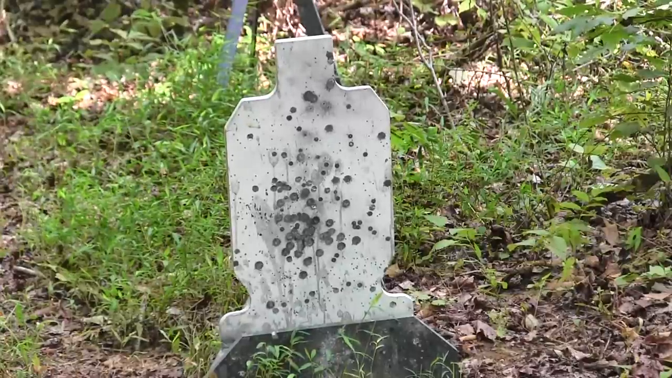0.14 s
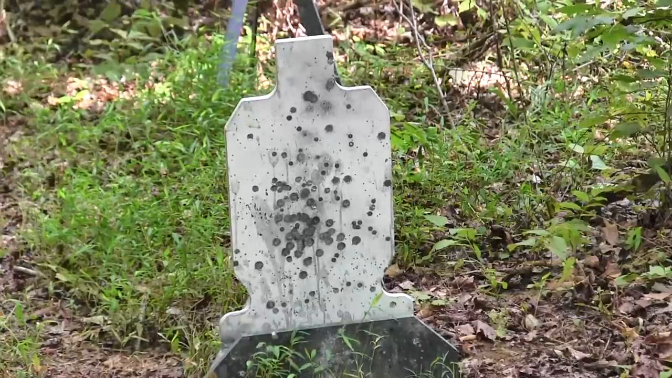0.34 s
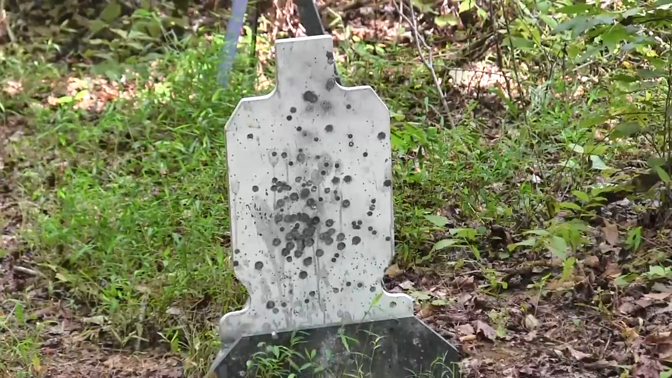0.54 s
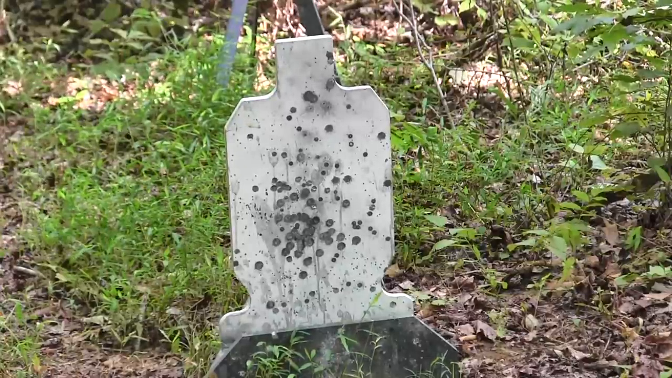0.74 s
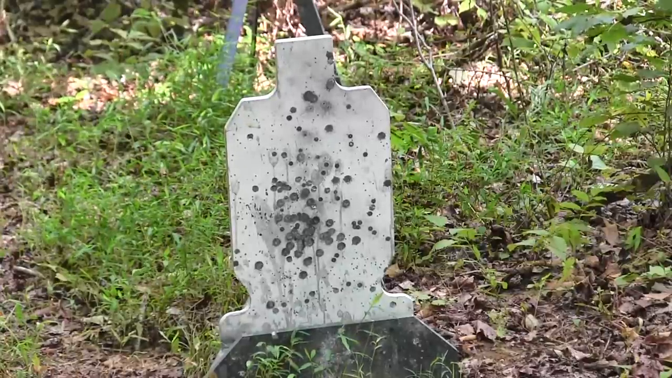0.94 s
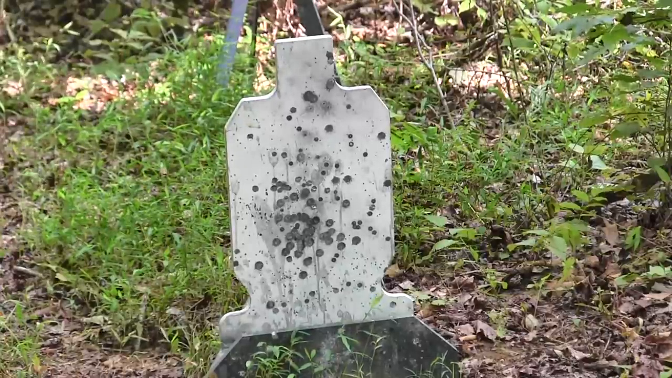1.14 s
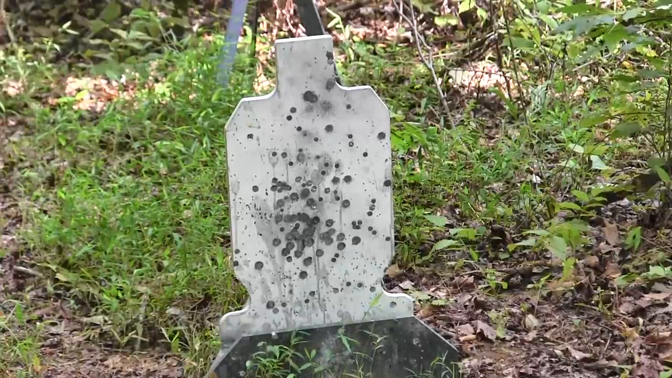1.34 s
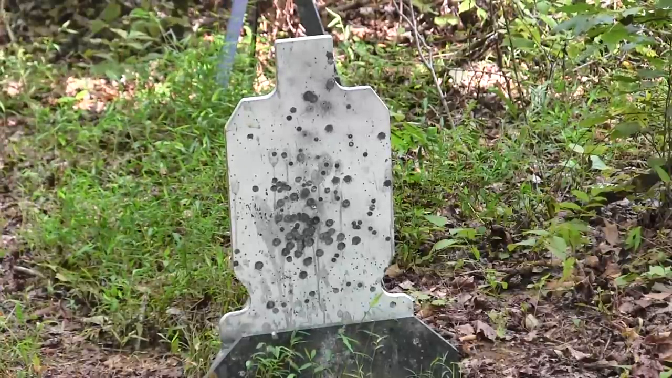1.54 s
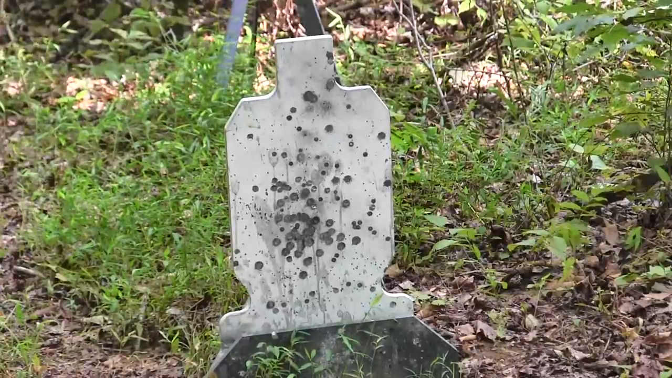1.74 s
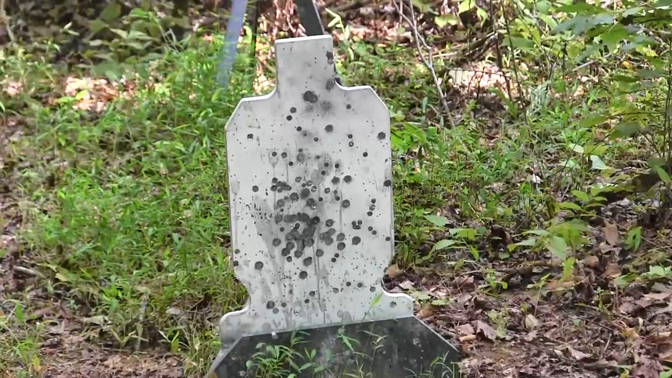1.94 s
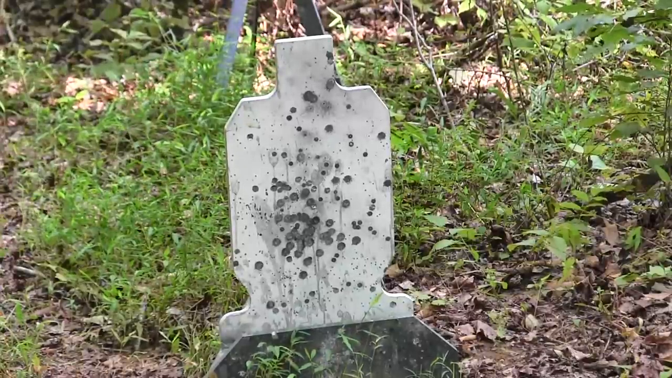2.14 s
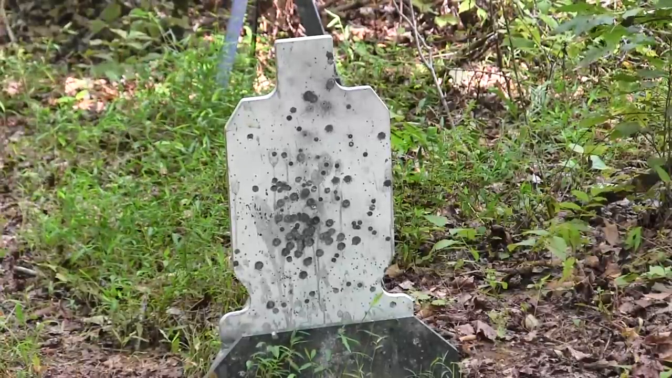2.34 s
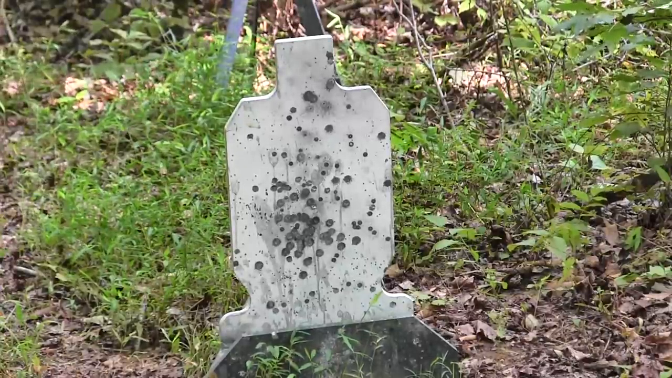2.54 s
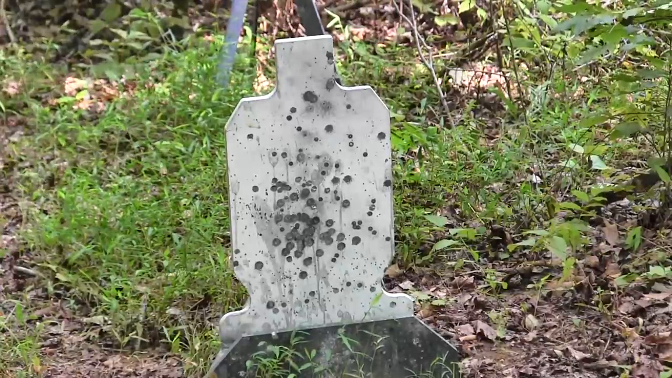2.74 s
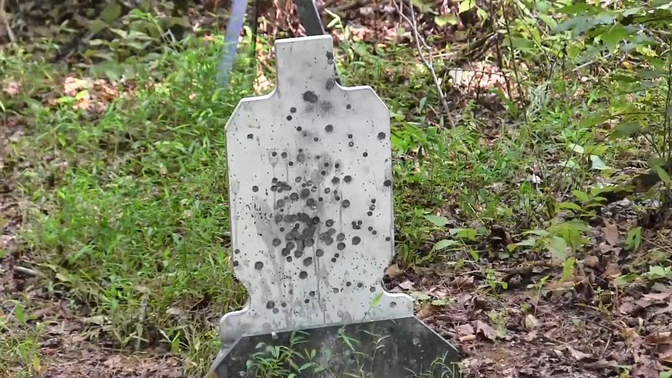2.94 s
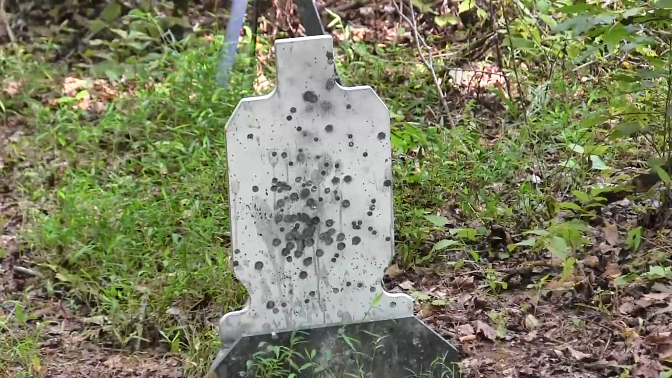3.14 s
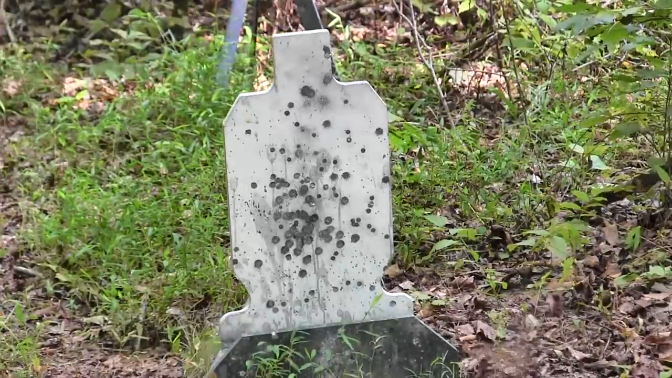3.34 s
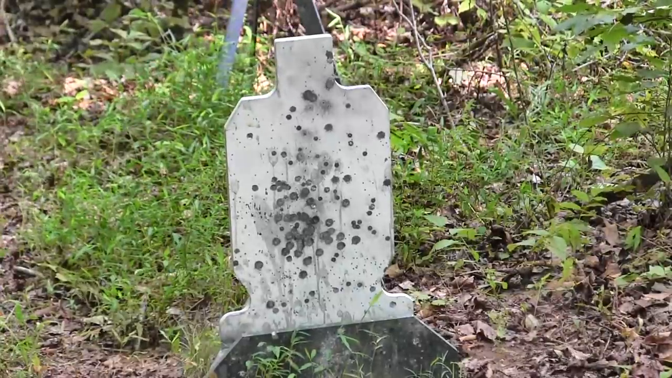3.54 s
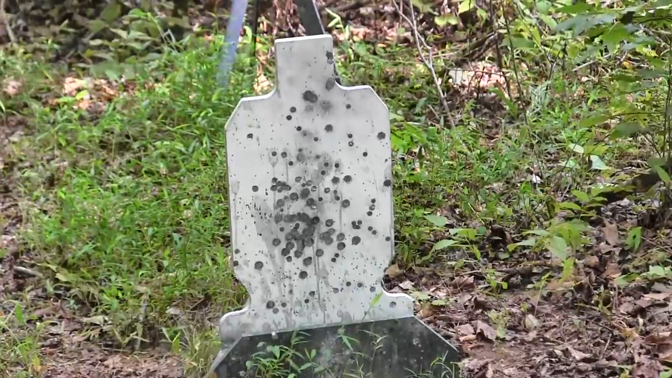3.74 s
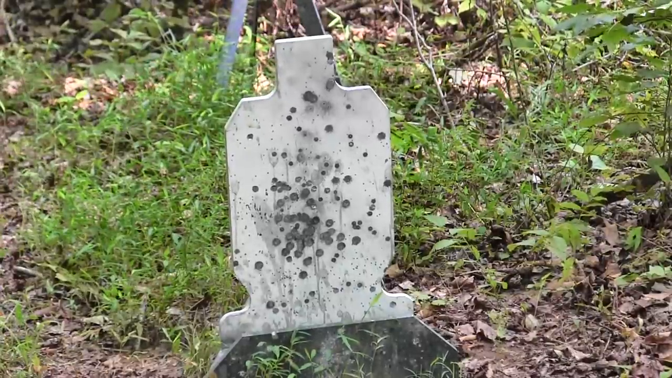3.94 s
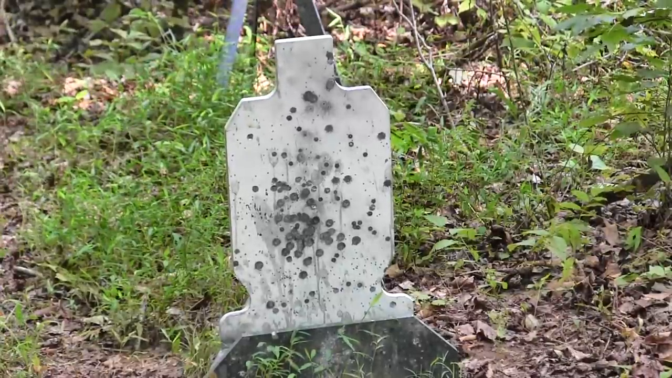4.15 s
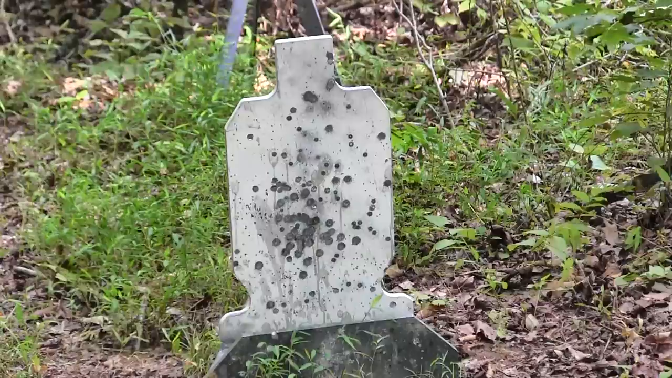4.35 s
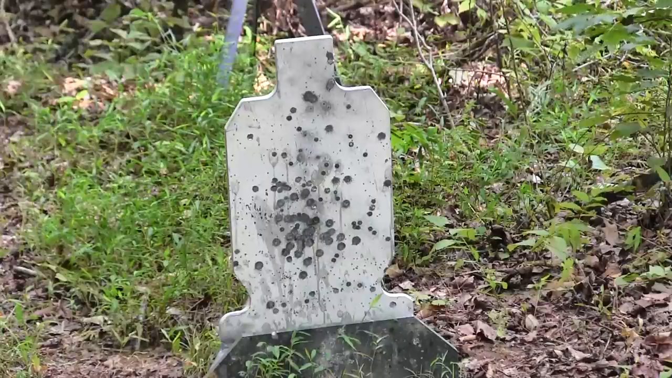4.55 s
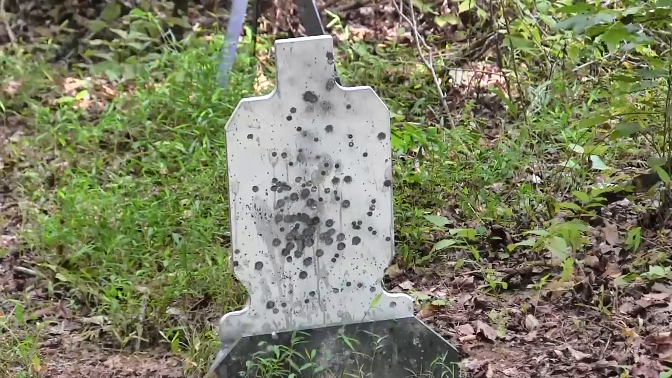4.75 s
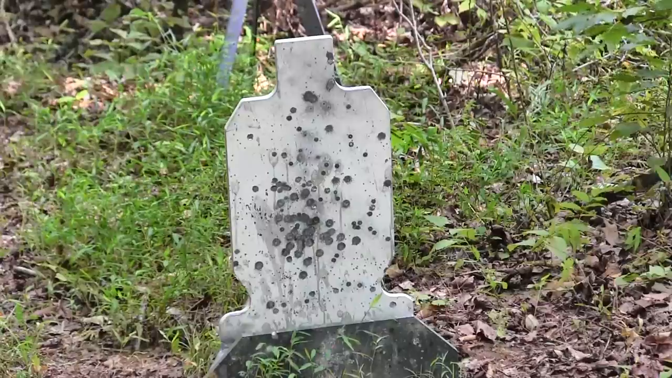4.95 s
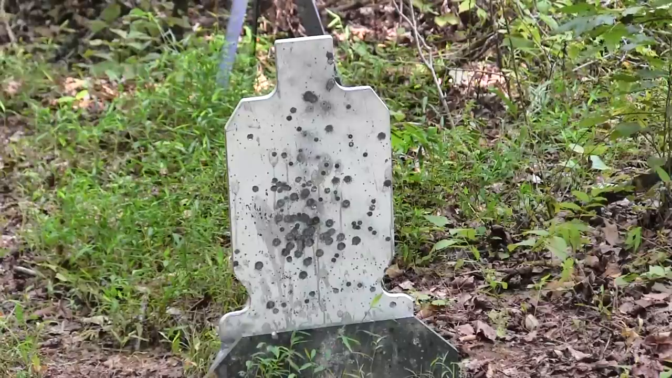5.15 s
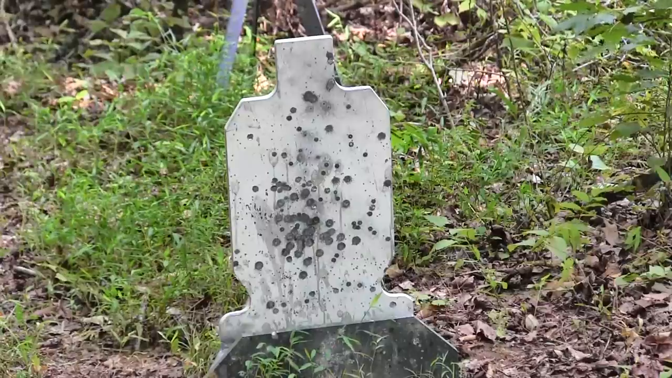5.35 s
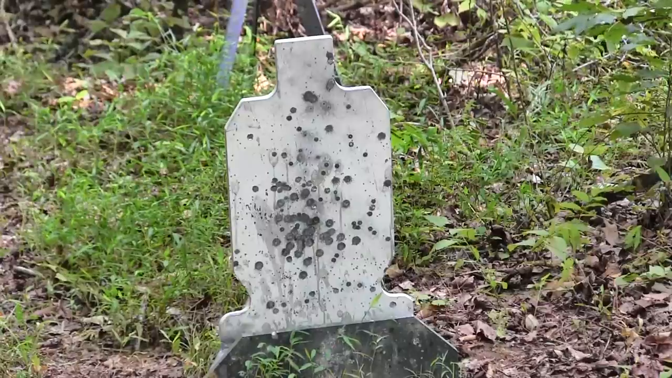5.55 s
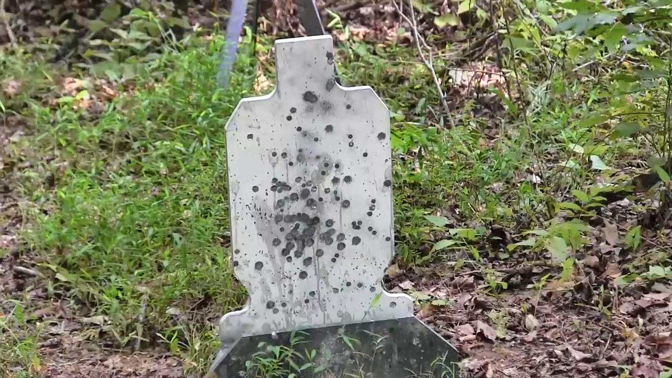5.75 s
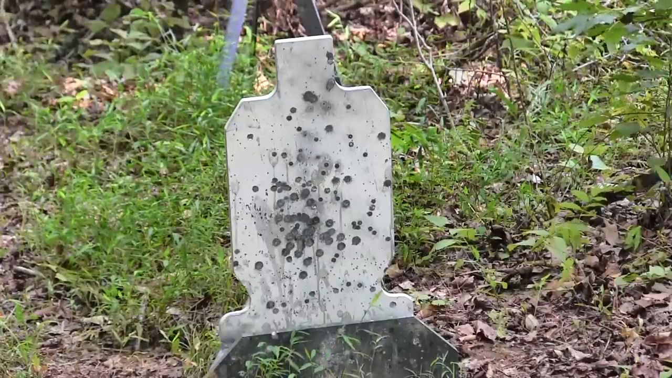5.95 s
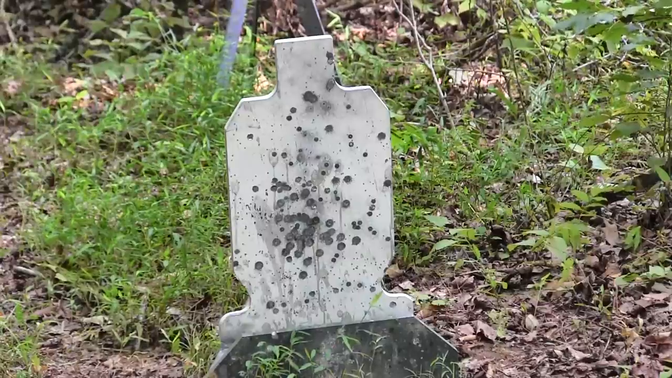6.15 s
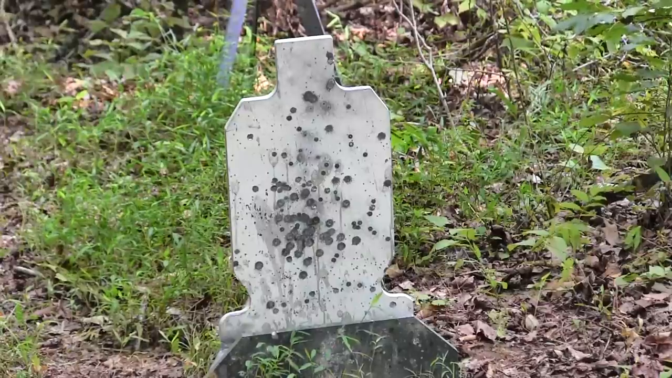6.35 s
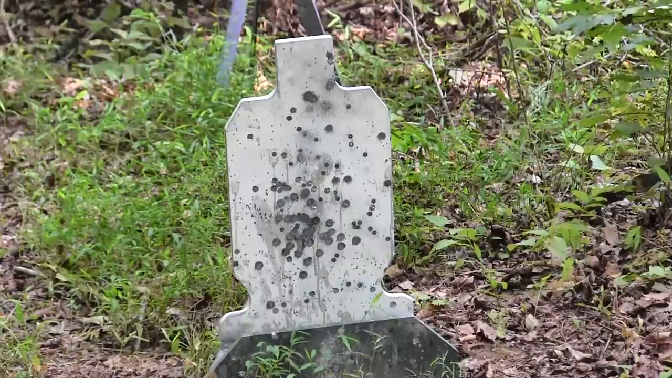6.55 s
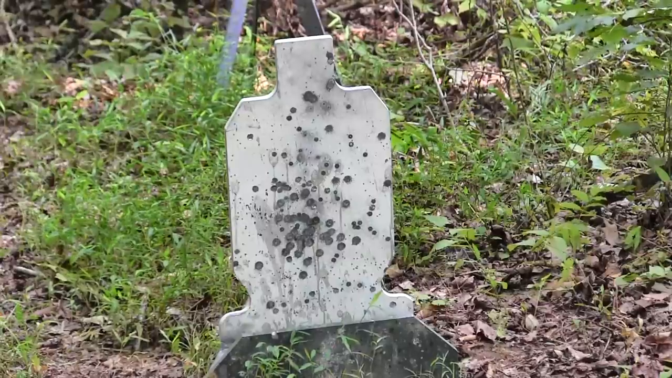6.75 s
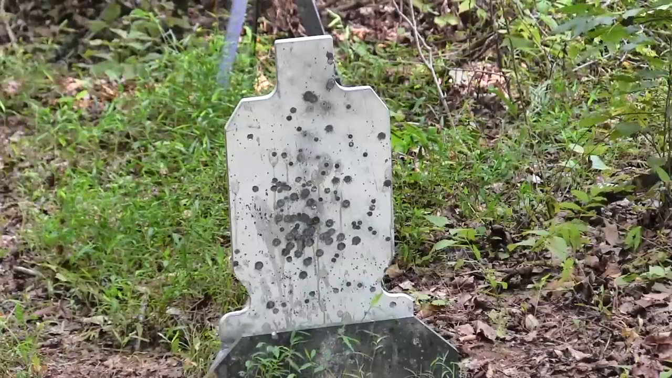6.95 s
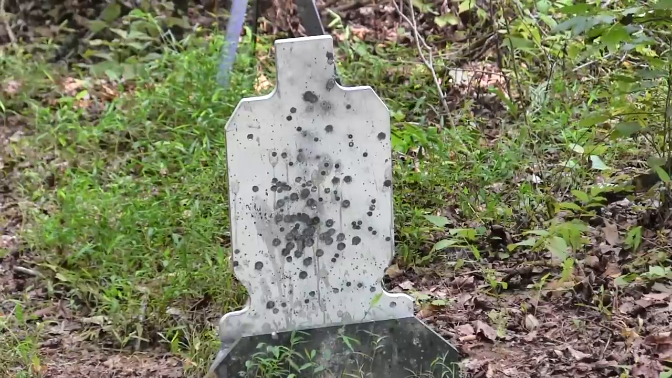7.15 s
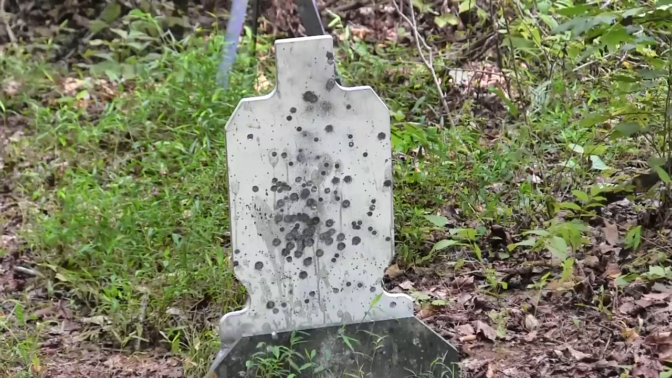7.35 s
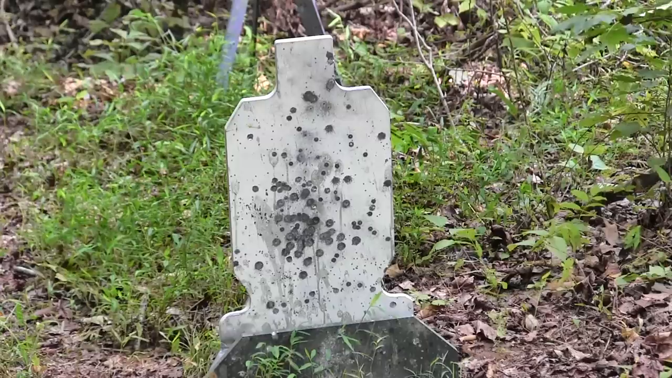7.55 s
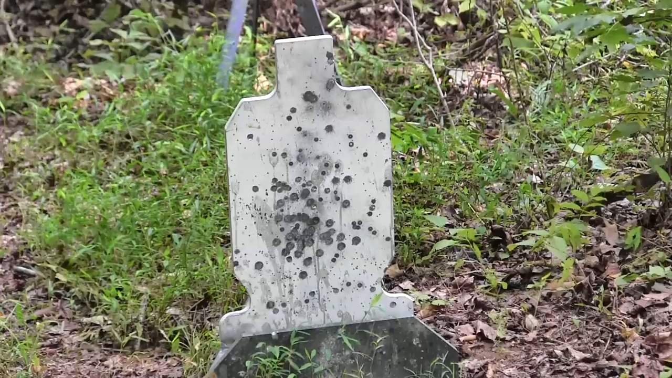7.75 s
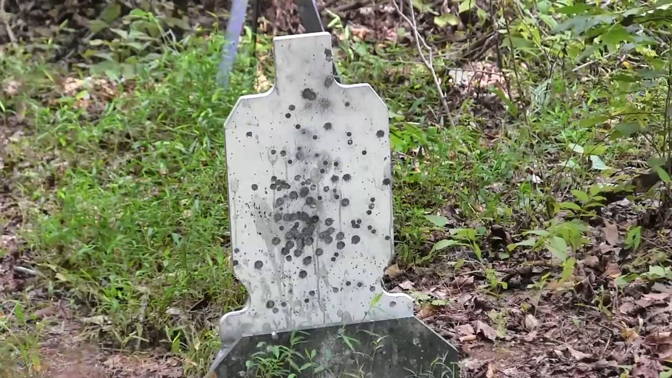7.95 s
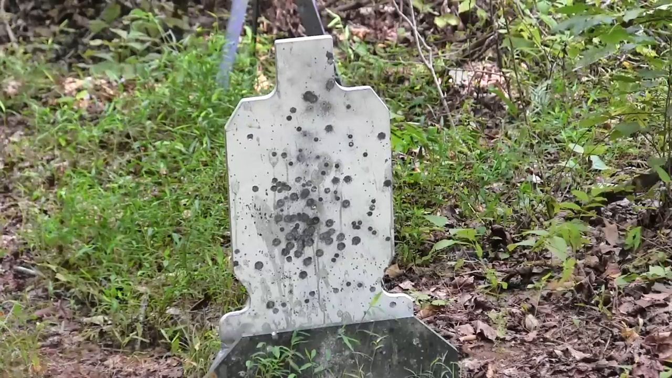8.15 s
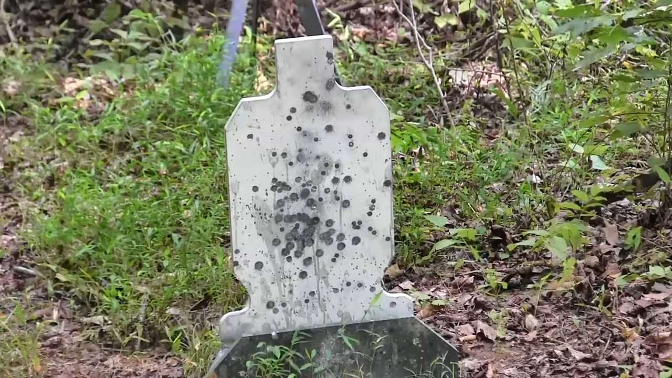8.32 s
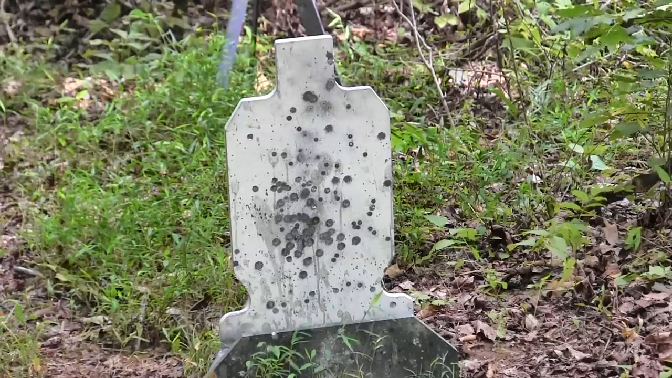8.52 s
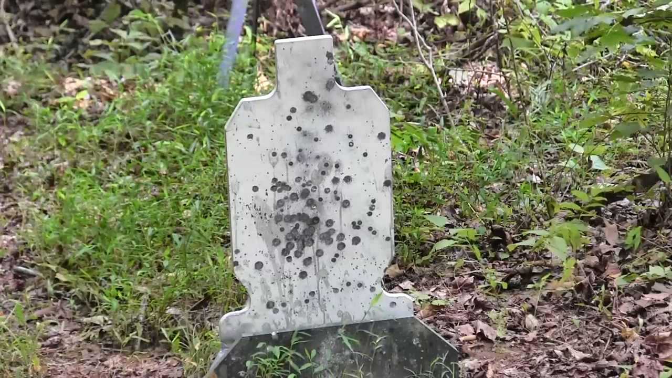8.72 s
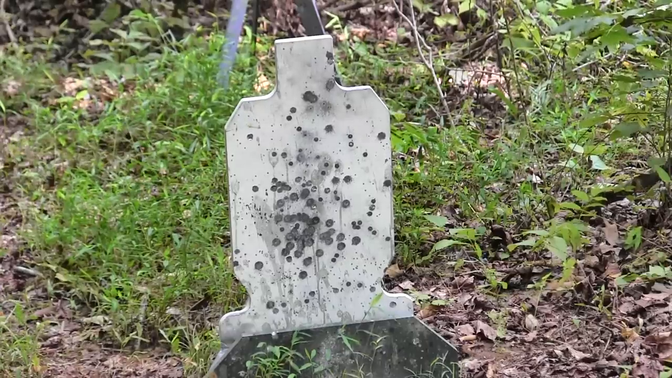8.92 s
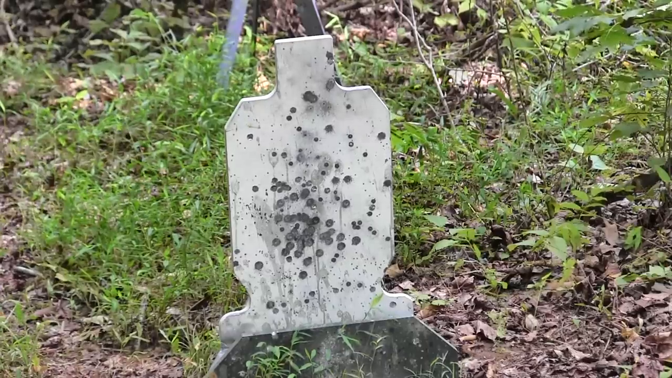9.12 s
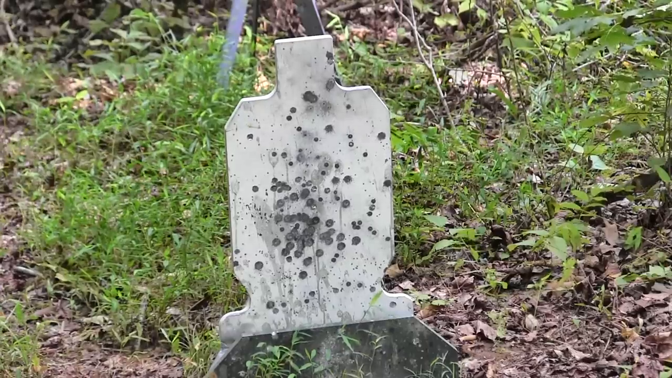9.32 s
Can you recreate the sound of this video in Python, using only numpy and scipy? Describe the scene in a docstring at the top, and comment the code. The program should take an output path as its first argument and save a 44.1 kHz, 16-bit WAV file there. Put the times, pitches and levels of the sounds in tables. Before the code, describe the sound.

Amid shrill insects and forest hush, two sharp bullet cracks each end in a bright metallic clang, forest echo and distant rifle thump.

```python
"""In the woods, with crickets and katydids around the microphone, two bullets hit a steel plate. Each sheds a
supersonic crack, shaped noise thrown off the trunks until it strikes; the plate clangs as a bank of decaying
modes. A quarter of a second later the forest throws back crack and ring, and the thump of the far rifle
follows. The litter rustles at the start, and fragments and twigs patter into it as short bursts of noise; the
insects are trains of falling tones over a hush and a breeze of coloured noise."""
import sys
import numpy as np
from scipy import signal
from scipy.fft import rfft, irfft, next_fast_len
from scipy.io import wavfile
from scipy.ndimage import uniform_filter1d, map_coordinates

SR = 44100
rng = np.random.default_rng(int(sys.argv[2]) if len(sys.argv) > 2 else 0)


def output_pcm(signal):
    """Save a mono or channel-first signal as 16-bit PCM at the path in sys.argv[1].

    Samples are clipped to [-1, 1] before scaling.
    """
    pcm = np.clip(np.atleast_2d(signal).T, -1, 1) * 32767
    wavfile.write(sys.argv[1], SR, np.round(pcm).astype(np.int16))


N = 418068
TIME = np.arange(N) / SR

# The spectra of the woods. Each row: frequency in Hz, relative density in dB per Hz.
# the hush among the trees, the low breeze and the far insect chorus
HUSH_SPECTRUM = [(20, -23), (50, -29), (90, -4.5), (130, 2.5), (240, -8), (800, -8), (2000, -12.5),
                 (4300, -15.5), (6500, -13), (7700, -19), (8800, -25), (12000, -27.5), (15800, -38)]
BREEZE_SPECTRUM = [(18, 6), (45, 6), (85, 2), (160, -3), (400, -14), (1500, -66)]
CHORUS_SPECTRUM = [(3500, -45), (4800, -2.5), (5400, 7.5), (5750, 9), (6100, -2.5), (6600, -3), (7200, -42),
                   (7800, -32), (8300, -82), (10000, -64)]
# fragments in the leaf litter
LITTER_SPECTRUM = [(100, -28), (600, -4.5), (1400, -2), (2300, 1.5), (4000, -2), (7000, -4), (11000, -16),
                   (15500, -26)]
# the bullet's shock wave, the low push of its front, and its smack into the steel
CRACK_SPECTRUM = [(30, -35), (90, -3), (180, 3.5), (300, -26), (450, -16), (900, -16), (1500, -7.5),
                  (2500, 3.5), (5500, -0.5), (8000, 0), (11000, -8.5), (15500, -20)]
PUSH_SPECTRUM = [(30, -55), (60, -28), (100, -3), (180, -0.5), (260, -4), (400, -25), (900, -21)]
SMACK_SPECTRUM = [(60, -34), (300, -11.5), (600, -15.5), (1500, -4), (3000, -7), (5500, 3), (7500, -27),
                  (11000, -24), (15500, -27)]
# what comes back from the forest, from the near leaves and from the big trunks, and the far rifle
FOREST_SPECTRUM = [(40, -47), (130, -28), (350, -22), (550, -5.5), (800, -4), (1200, 1), (2600, 2.5),
                   (4000, 5.5), (6000, 1), (8000, -7.5), (11000, -27), (15500, -63)]
LEAVES_SPECTRUM = [(1500, -38), (4000, -7), (7000, 4.5), (10000, 2.5), (15500, -28)]
TRUNKS_SPECTRUM = [(50, -32), (110, -10), (200, -3.5), (450, -3), (900, -18)]
RIFLE_SPECTRUM = [(25, -36), (50, -7), (85, 13.5), (140, 9), (280, 2.5), (500, 6), (900, -30),
                  (3000, -18.5)]

# Bouts of the quick cricket. Each row: start in seconds, end in seconds, level in dB.
QUICK_BOUTS = [(-.3, 4.1, -55), (7.1, 8.6, -54), (9.1, 9.8, -50)]
# Trills, bursts of falling chirps. Each row: start in seconds, end in seconds, level in dB.
TRILL_BURSTS = [(.8, 1.56, -52), (3.1, 3.6, -49), (6.62, 7.26, -51)]
# Katydid buzzes. Each row: start in seconds, end in seconds, level in dB.
KATYDID_BUZZES = [(0, .12, -62), (.28, .39, -65), (.46, .64, -64), (5.02, 5.12, -65), (5.33, 5.41, -63),
                  (5.69, 5.8, -63.5)]

# Single bits landing on leaves and twigs. Each row: time in seconds, relative level in dB, pitch in Hz,
# 60 dB decay of the leaf's rattle in seconds.
LEAF_TICKS = [(0.5148, -28, 5200, 0.014), (1.268, -33.5, 2190, .03), (1.348, -25.5, 5300, 0.021),
              (2.4202, -20, 4140, 0.0076), (4.071, -21, 6500, 0.036), (4.333, -31.5, 7000, 0.079),
              (5.4548, -15.5, 5700, 0.0047), (5.871, -20, 2630, 0.037), (6.082, -29, 4500, 0.01),
              (6.3331, -29, 5960, 0.045), (6.5334, -28.5, 5160, 0.04), (6.7678, -27.5, 2560, 0.081),
              (6.9909, -31.5, 3400, 0.11), (7.275, -33.5, 2020, 0.048), (7.4561, -24, 4350, 0.0097),
              (8.464, -29, 7440, 0.022), (9.033, -21.5, 4000, 0.0073), (9.115, -18, 1900, 0.014),
              (9.3672, -23, 7750, .012)]
# Rustles and sprays of fragments in the litter; the first row, at the start, is a rustle before any shot. Each
# row: start in seconds, relative level in dB, 60 dB decay in seconds.
LITTER_SPRAYS = [(0.005, -47.5, 0.72), (4.405, -39, 0.39), (4.798, -37.5, 0.72), (5.025, -46, 0.39),
                 (5.871, -41.5, 0.055), (8.85, -44.5, 0.49), (9.114, -42, 0.1), (9.17, -40, 0.42)]

# The two shots. Each row: crack in seconds, strike in seconds, crack level in dB, forest echo level in dB,
# delay from strike to echo peak in seconds, rifle thump in seconds, thump level in dB,
# lift of the lingering ring in dB; the levels are relative.
SHOTS = [(3.3581, 3.4071, -10.5, -17.5, 0.25, 3.725, -27.5, 16),
         (7.9535, 8.011, -9.5, -19, 0.24, 8.272, -33, 13)]
# Modes of the steel plate. Each row: frequency in Hz, 60 dB decay in seconds before the choke,
# then relative levels in dB: first strike, second strike, first echo, second echo, late tail.
PLATE_MODES = [(554.0, 0.49, -33.0, -34.0, -51.0, -51.0, -63), (696, 0.5, -47, -45, -48, -52, -68),
               (976.7, 1.5, -16.0, -15.0, -27.0, -28.5, -39.5),
               (1484.0, 1.21, -27.0, -32.0, -25.0, -30.0, -44),
               (1740.5, 1.44, -31.0, -34.5, -29.0, -31.0, -44),
               (2213.6, 1.5, -45.0, -38.0, -33.0, -23.0, -39),
               (2420.0, 0.86, -47.0, -42.0, -40.0, -36.0, -47),
               (2584.0, 0.46, -31.0, -42.0, -33.0, -46.0, -51),
               (2719.0, 1.5, -45.0, -56.0, -34.0, -46.0, -56),
               (2939.0, 0.44, -46.0, -39.0, -48.0, -46.0, -55),
               (3174.0, 0.47, -23.0, -20.0, -33.0, -28.0, -46),
               (3468.0, 0.42, -34.0, -38.0, -35.0, -38.0, -56),
               (3811.0, 1.5, -52.0, -41.0, -46.0, -39.0, -60),
               (4154.0, 1.0, -32.0, -40.0, -47.0, -46.0, -58),
               (4521.0, 0.89, -16.0, -15.0, -17.0, -17.0, -42),
               (4599.0, 0.35, -25.0, -19.0, -35.0, -37.0, -52),
               (4979.0, 1.5, -35.5, -43.0, -27.5, -32.5, -46),
               (5603.0, 1.5, -34.0, -29.0, -48.0, -41.0, -61),
               (5652.0, 0.35, -14.0, -18.0, -35.0, -35.0, -49),
               (5808.0, 1.11, -27.0, -33.0, -37.0, -46.0, -56),
               (5876.0, 0.62, -30.0, -31.0, -43.0, -46.0, -61),
               (5978.0, 1.5, -21.0, -48.0, -31.0, -50.0, -62),
               (6573.0, 1.24, -39.0, -43.0, -46.0, -48.0, -67),
               (6767.0, 1.35, -33.0, -43.0, -43.0, -55.0, -64),
               (7273.0, 1.5, -45.0, -35.0, -55.0, -42.0, -65),
               (7483.0, 1.5, -39.0, -52.0, -45.0, -64.0, -70),
               (7795.0, 0.53, -49.0, -52.0, -45.0, -58.0, -73),
               (9060.0, 1.5, -44.0, -40.0, -48.0, -42.0, -74),
               (10290.0, 1.5, -49.0, -55.0, -47.0, -43.0, -69),
               (11140.0, 1.5, -54.0, -54.0, -54.0, -63.0, -81)]

# steady levels of the woods (dB); the breeze drops off slowly to a calm
HUSH_DB, CHORUS_DB, SLOW_CRICKET_DB, BREEZE_DB, BREEZE_DB_PER_S, CALM_DB = -52.5, -56, -56, -56.5, 3.5, -68
# the crack: a short front, then trunk echoes that fade as the bullet flies on
FRONT_RISE_S, FRONT_S, TRUNKS_DB, TRUNKS_DB_PER_S = 0.0023, 0.0092, -2.5, 48
# the struck plate swings: its ring dips once, and later the mount chokes it
RING_DB, DIP_S, DIP_WIDTH_S, DIP_DB, CHOKE_S, CHOKE_DB_PER_S = 3.5, 0.18, 0.015, 9.5, 0.36, 58
# the plate's main note throbs, ever more slowly (stretch per beat and depth are shares, 0-1)
NOTE_HZ, BEAT_S, BEAT_STRETCH, BEAT_DEPTH = 976.7, 0.1358, 0.136, 0.83
# a mode whose echo beats its mean over both shots also lingers: share (0-1) of those dB kept in the tail
LINGER = 0.38
TOP_HZ = 15900  # upper band limit


def amp(db):
    """Decibels to gain."""
    return 10 ** (np.asarray(db) / 20)


def unit(x):
    """Scale to rms 1."""
    return x / np.sqrt(np.mean(x ** 2) + 1e-20)


def wobble(rate, size=N):
    """A smooth random curve, rate knots a second."""
    knots = rng.standard_normal(int(size * rate / SR) + 4)
    return map_coordinates(knots, [np.arange(size) * rate / SR], order=2)


def colour(x, spectrum):
    """Shape x by (Hz, dB) points on a log axis; the result has rms 1."""
    m = next_fast_len(len(x))
    hz, db = np.transpose(spectrum)
    log_hz = np.log(np.fft.rfftfreq(m, 1 / SR) + 1)
    gain = amp(np.interp(log_hz, np.log(hz), db))
    return unit(irfft(rfft(x, m) * gain, m)[:len(x)])


def noise(spectrum, size=N, spiky_db=0, patchy_db=0):
    """Coloured noise; spiky_db makes it uneven in snaps, patchy_db adds the shifting comb of reflections."""
    # a new random size every 16 samples
    spikes_db = spiky_db * np.clip(rng.standard_normal(size // 16 + 1), -2, 2)
    x = rng.standard_normal(size) * amp(spikes_db).repeat(16)[:size]
    if patchy_db:
        z = signal.stft(x, nperseg=256)[2]
        # random gains, smoothed across frequency and then across time
        field = uniform_filter1d(rng.standard_normal(z.shape), size=3, axis=0)
        field = uniform_filter1d(field, size=10, axis=1)
        x = signal.istft(z * amp(patchy_db * unit(field)), nperseg=256)[1][:size]
    return colour(x, spectrum)


def add(track, s, sound):
    """Mix a sound into a track at time s."""
    room = track[round(s * SR):][:len(sound)]
    room += sound[:len(room)]


def shaped(x, envelope):
    """x under an envelope, with the energy that the envelope sets."""
    y = x * envelope
    return y * np.sqrt(np.sum(envelope ** 2) / np.sum(np.abs(y) ** 2))


def fading(rate, size):
    """The sum of many echo paths: a complex gain that swells and drops out."""
    return wobble(rate, size=size) + 1j * wobble(rate, size=size)


def swell(t, rise_db_per_s, fall_db_per_s, tail_db, tail_db_per_s):
    """Gain of an echo that peaks at t = 0: it builds up, dies away and leaves a slower tail."""
    early, late = np.maximum(-t, 0), np.maximum(t, 0)
    dying_db = np.maximum(-fall_db_per_s * late, tail_db - tail_db_per_s * late)
    return amp(dying_db - rise_db_per_s * early)


def air():
    """The hush of the woods, with a light breeze low down that dies to a calm."""
    hush = amp(HUSH_DB + 0.13 * wobble(3.3)) * noise(HUSH_SPECTRUM)
    breeze = amp(BREEZE_DB - BREEZE_DB_PER_S * TIME)
    stirred = amp(2.0) * breeze * noise(HUSH_SPECTRUM)
    gusts = amp(1.3 * wobble(12))
    low_wind = np.hypot(breeze, amp(CALM_DB)) * gusts * noise(BREEZE_SPECTRUM)
    return hush + stirred + low_wind


def chirps(hz, fall_hz, rate, duty, rough):
    """Wing strokes: each is a short tone that falls as the scraper slows, blurred by the foliage."""
    # position in the stroke cycle (0-1); the tone fills the share duty of it
    stroke = np.cumsum(rate * (1 + .02 * wobble(5))) / SR % 1
    u = np.clip(stroke / duty, 0, 1)
    pitch = hz - fall_hz * (u - .5) + 25 * wobble(23)
    phase = 2 * np.pi * np.cumsum(pitch) / SR
    loudness = np.sin(np.pi * u) * amp(1.7 * wobble(6.6))
    return unit(loudness * np.sin(phase + rough * wobble(350)))


def bursts(rows, edge):
    """Level of a singer that swells in over edge seconds and stops again in half that time."""
    level = np.zeros(N)
    for start, end, db in rows:
        ramps = np.minimum((TIME - start) / edge, 2 * (end - TIME) / edge)
        level += amp(db) * np.clip(ramps, 0, 1)
    return level


def insects():
    """Near crickets and katydids, each a train of wing strokes, over a far chorus of coloured noise."""
    slow = amp(SLOW_CRICKET_DB) * chirps(hz=5704, fall_hz=260, rate=14, duty=0.36, rough=0.47)
    quick = bursts(QUICK_BOUTS, edge=0.33) * chirps(hz=5820, fall_hz=200, rate=36.0, duty=0.84, rough=0.38)
    trill = bursts(TRILL_BURSTS, edge=0.15) * chirps(hz=5370, fall_hz=730, rate=55, duty=0.77, rough=0.26)
    buzz = bursts(KATYDID_BUZZES, edge=0.013) * chirps(hz=8200, fall_hz=61.3, rate=61, duty=0.26, rough=1.4)
    whine = amp(-70.0) * chirps(hz=7700, fall_hz=61, rate=18, duty=0.98, rough=1.0)
    chorus = amp(CHORUS_DB + 0.25 * wobble(1.36)) * noise(CHORUS_SPECTRUM)
    return slow + quick + trill + buzz + whine + chorus


def tick(db, hz, t60):
    """One bit hitting a dry leaf: a snap, the leaf's brief rattle and a faint answer from around."""
    t = TIME[:SR // 8]
    leaf = [(hz / 10, -21), (hz / 3, -10), (hz / 1.28, -3), (hz, 0), (hz * 1.82, -10), (hz * 4, -38)]
    snap, rattle, answer = amp(-60 * t / 0.0042), amp(-5.5 - 60 * t / t60), amp(-23.5 - 60 * t / 0.43)
    envelope = amp(db - 7.0) * (snap + rattle + answer)
    burst = np.pad(rng.standard_normal(len(t)) * envelope, (16, 0))
    return colour(burst, leaf) * np.sqrt(np.mean(envelope ** 2))


def debris(count=36):
    """Falling bits tick on dry leaves; the litter rustles, and sprays of fragments crackle through it."""
    out, t = np.zeros(N), TIME[:SR // 2]
    for s, db, hz, t60 in LEAF_TICKS:
        add(out, s, tick(db, hz, t60))
    # faint ticks at random moments
    for when, size, pitch in rng.random((count, 3)):
        add(out, when * N / SR, tick(-46 + 9 * size, 3500 + 5500 * pitch, 0.061))
    for s, db, t60 in LITTER_SPRAYS:
        dying = np.maximum(t - .025, 0)
        spray = amp(db - 60 * dying / t60) * (1 + .5 * np.exp(-t / 0.0024))
        # the litter crackles in clumps, and each leaf has a pitch of its own
        clumps = amp(1.7 * wobble(220, size=len(t)))
        crackle = clumps * noise(LITTER_SPECTRUM, size=len(t), spiky_db=-0.2, patchy_db=2.5)
        add(out, s, shaped(crackle, spray))
    return out


def cracks():
    """The shock wave bounces off trunk after trunk until the bullet smacks into the steel."""
    out, t = np.zeros(N), TIME[:SR // 2]
    for s, strike_s, db, *_ in SHOTS:
        # the crack is cut off from 3 ms before the strike
        stopped = np.maximum(t - (strike_s - s) + .003, 0)
        shock = noise(CRACK_SPECTRUM, size=len(t), spiky_db=2, patchy_db=3)
        trunks = amp(1.2 * wobble(350, size=len(t)))
        front = amp(2.5) * np.exp(-(t / FRONT_S) ** 4)
        path = np.maximum(front, amp(TRUNKS_DB - TRUNKS_DB_PER_S * t)) * (1 - np.exp(-t / FRONT_RISE_S))
        add(out, s, shaped(shock * trunks, path * amp(db - 60 * stopped / 0.028)))
        # the front itself pushes the air: a short low bump
        push = amp(-15.5 - 60 * t / 0.048) + amp(-28.0 - 60 * t / 0.33)
        push *= 1 - np.exp(-(t / 0.00098) ** 2)
        add(out, s, shaped(noise(PUSH_SPECTRUM, size=len(t)), push))
        blow = amp(-3 - 60 * t / .016)
        splash = blow + amp(-28 - 60 * t / 0.6)
        add(out, strike_s, shaped(noise(SMACK_SPECTRUM, size=len(t)), splash))
    return out


def clangs():
    """Each strike rings the plate's modes; the ring returns from the trees, fading in and out over many paths."""
    out, t = np.zeros(N), TIME[:2 * SR]
    dip_db = DIP_DB * np.exp(-((t - DIP_S) / DIP_WIDTH_S) ** 2)
    swing_db = RING_DB - dip_db - CHOKE_DB_PER_S * np.maximum(t - CHOKE_S, 0)
    # beats counted so far, each longer than the last; the first half beat stays level
    beats = np.log1p(BEAT_STRETCH * t / BEAT_S) / BEAT_STRETCH
    throb = 1 - BEAT_DEPTH * (1 - np.abs(np.sin(np.pi * beats))) * np.clip(2 * beats - 1, 0, 1)
    edges = (1 - np.exp(-t / .0002)) * np.minimum(10 * (t[-1] - t), 1)
    for k, (_, strike_s, _, _, delay, _, _, linger_db) in enumerate(SHOTS):
        returning = swell(t - delay, rise_db_per_s=129, fall_db_per_s=41.5, tail_db=-6.5, tail_db_per_s=10.5)
        for hz, t60, *levels, tail_db in PLATE_MODES:
            strike_db, return_db, mean_return_db = levels[k], levels[k + 2], np.mean(levels[2:])
            # one blow starts all the modes together
            turn = np.exp(2j * np.pi * hz * t)
            # short waves are scattered most by the leaves
            scatter = 1 + hz / 45000 * fading(130, size=len(t))
            direct = amp(strike_db + swing_db - 60 * t / t60)
            paths = .5 + fading(12, size=len(t)) + .5 * fading(42, size=len(t))
            # even out the strongest swells
            paths /= (.7 + np.abs(paths) ** 2) ** .3
            if hz == NOTE_HZ:
                direct, paths = direct * throb, throb
            # the first strong echo sinks into a long tail, in which low modes sing on longest
            sunk = np.clip((t - delay - .06) / .22, 0, 1)
            loss = 30 * (hz / 1000) ** 0.31 * np.maximum(t - .55, 0)
            late_db = tail_db + LINGER * (return_db - mean_return_db) + linger_db
            echo_db = (1 - sunk) * (return_db + 5.5) + sunk * late_db - loss
            echo = shaped(paths, amp(echo_db) * returning)
            add(out, strike_s, np.imag((direct + 1j * echo) * scatter * turn) * edges)
    return out


def forest():
    """The crack rolls back from the trees, duller as it dies, with the far rifle's thump inside it."""
    out, t = np.zeros(N), TIME[:2 * SR]
    for _, strike_s, _, db, delay, thump_s, thump_db, _ in SHOTS:
        roll = noise(FOREST_SPECTRUM, size=len(t), spiky_db=2, patchy_db=3)
        roll *= amp(1.0 * wobble(45, size=len(t)))
        dull = signal.sosfilt(signal.butter(2, 3500, fs=SR, output="sos"), roll)
        # share of the full roll against the dull one
        bright = np.exp(-np.maximum(t - delay, 0) / 1.0)
        answer = swell(t - delay, rise_db_per_s=62, fall_db_per_s=40.5, tail_db=-20, tail_db_per_s=4.5)
        add(out, strike_s, (bright * roll + (1 - bright) * dull) * amp(db - 6.5) * answer)
        # the near leaves return the treble first; big trunks return separate low thuds
        rustle = swell(t - .12, rise_db_per_s=88, fall_db_per_s=60, tail_db=-39.5, tail_db_per_s=32)
        add(out, strike_s, noise(LEAVES_SPECTRUM, size=len(t), patchy_db=1.0) * amp(-31.5) * rustle)
        knocks = amp(5 * wobble(28, size=len(t)))
        thuds = knocks * noise(TRUNKS_SPECTRUM, size=len(t))
        add(out, strike_s, shaped(thuds, amp(db - 23.5) * answer))
        # the far rifle: a quick boom and a long low tail, both lumpy
        boom = (amp(-60 * t / 0.13) + amp(-17 - 60 * t / 1.65)) * (1 - np.exp(-t / 0.0037))
        lumps = amp(4 * wobble(35, size=len(t)))
        thump = colour(lumps * boom * rng.standard_normal(len(t)), RIFLE_SPECTRUM)
        thump *= amp(thump_db) * np.sqrt(np.mean(boom ** 2))
        add(out, thump_s, thump * np.minimum(t[-1] - t, 1))
    return out


def scene():
    """Everything at one microphone."""
    return (air() + insects() + debris() + cracks() + clangs() + forest())[None]


def record(dry):
    """Peaks are rounded off; the microphone sheds the deepest bass, and nothing passes above the band limit."""
    held = dry / (1 + np.abs(dry) ** 10) ** (1 / 10)
    held = signal.sosfilt(signal.butter(2, 48, "highpass", fs=SR, output="sos"), held)
    m = next_fast_len(N + SR // 2)
    # a smooth edge 400 Hz wide
    edge = np.clip((TOP_HZ - np.fft.rfftfreq(m, 1 / SR)) / 400 + .5, 0, 1)
    return irfft(rfft(held, m) * np.sin(np.pi / 2 * edge) ** 2, m)[..., :N]


dry = scene()
out = record(dry)
output_pcm(out)
```